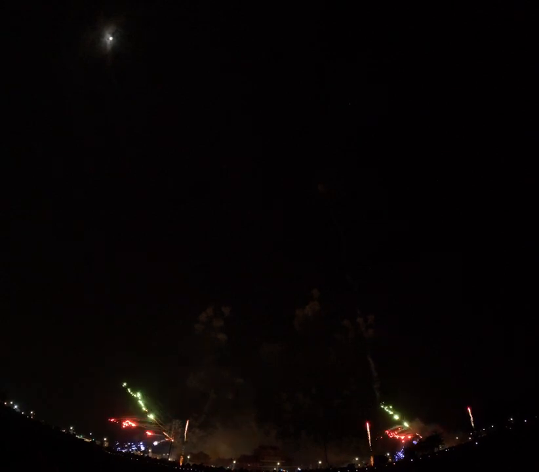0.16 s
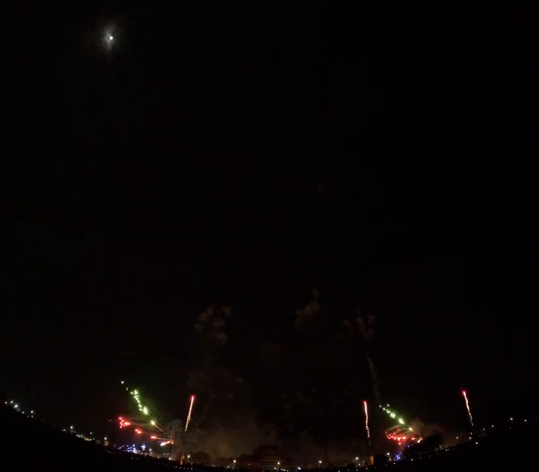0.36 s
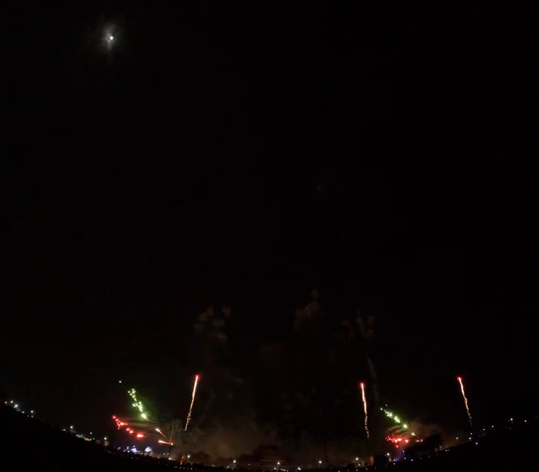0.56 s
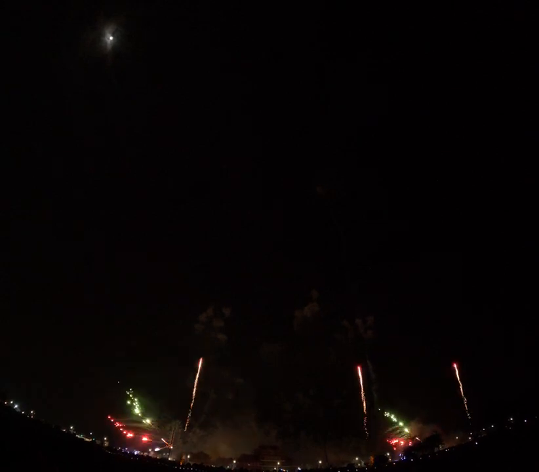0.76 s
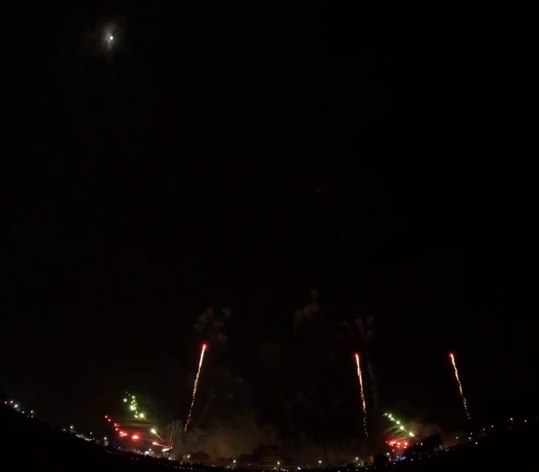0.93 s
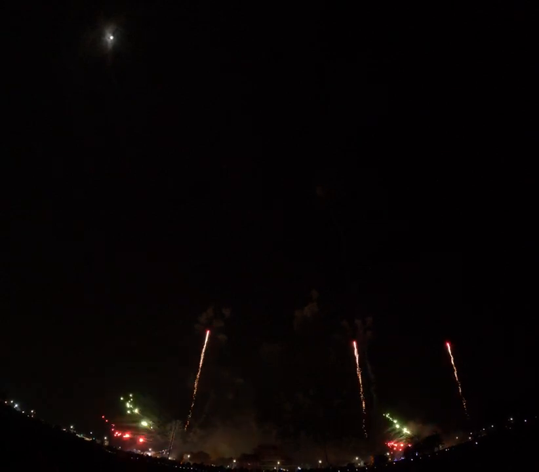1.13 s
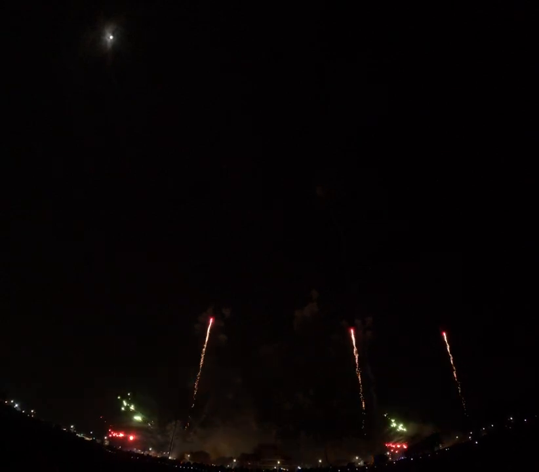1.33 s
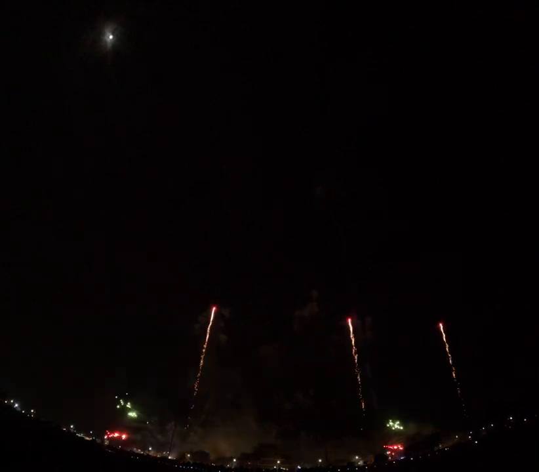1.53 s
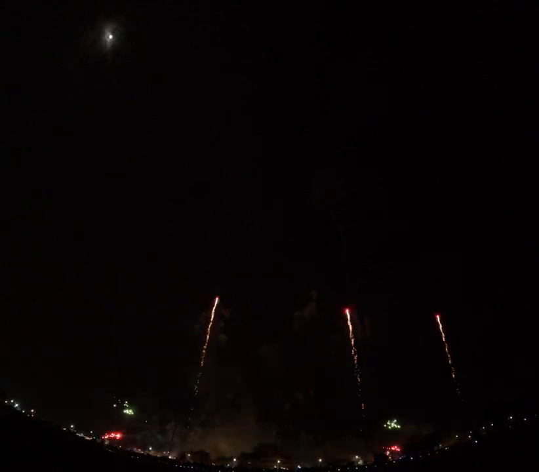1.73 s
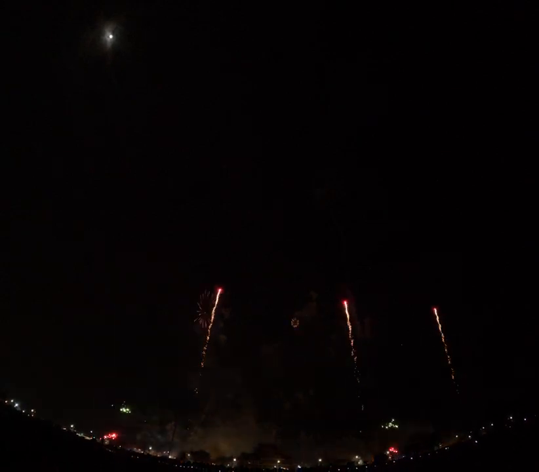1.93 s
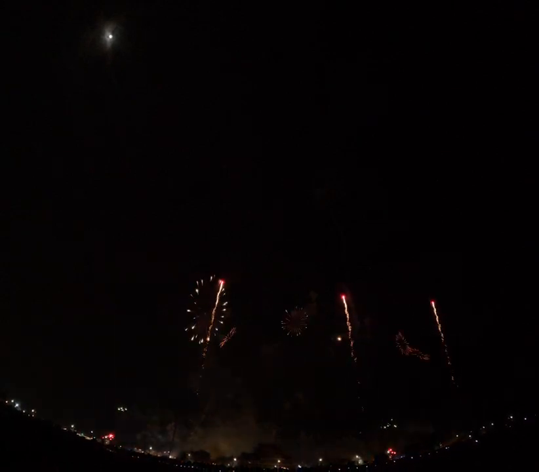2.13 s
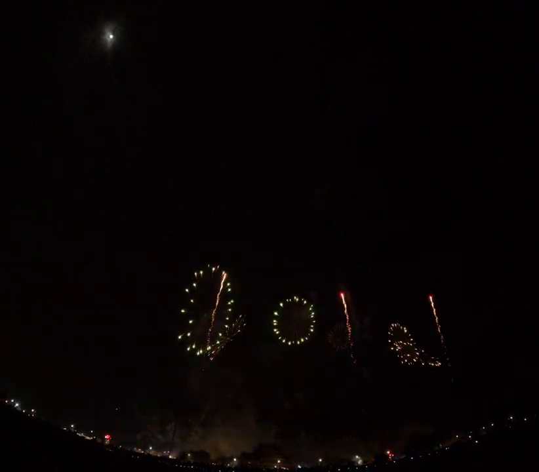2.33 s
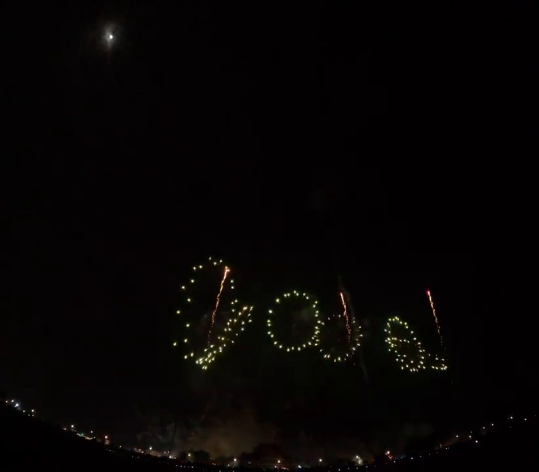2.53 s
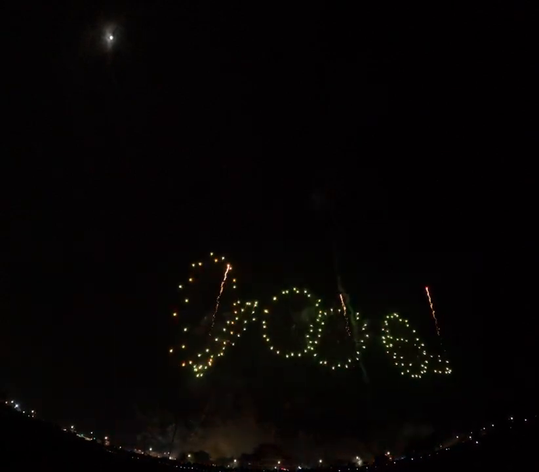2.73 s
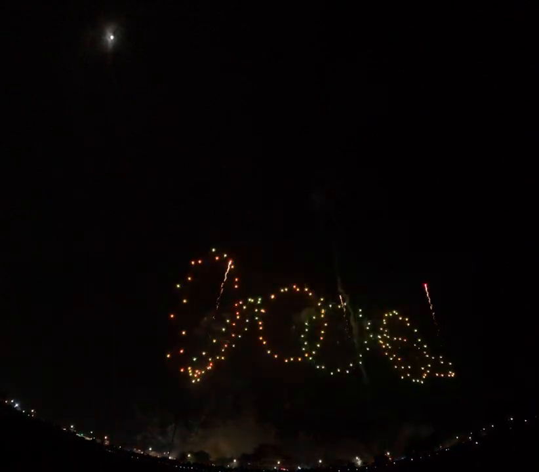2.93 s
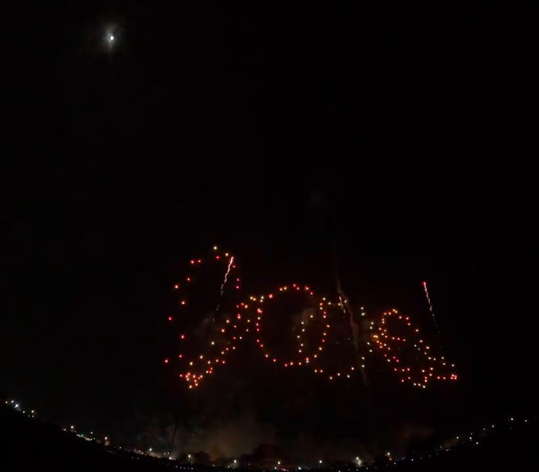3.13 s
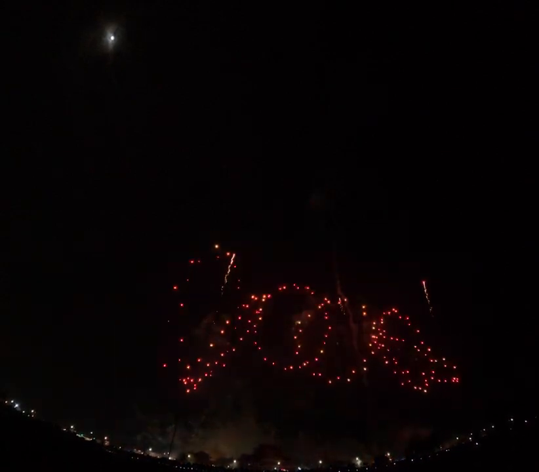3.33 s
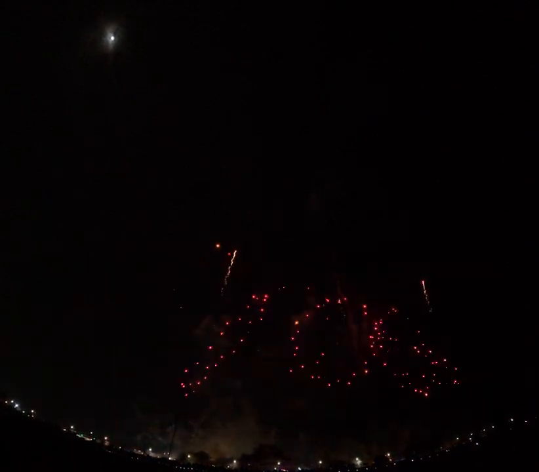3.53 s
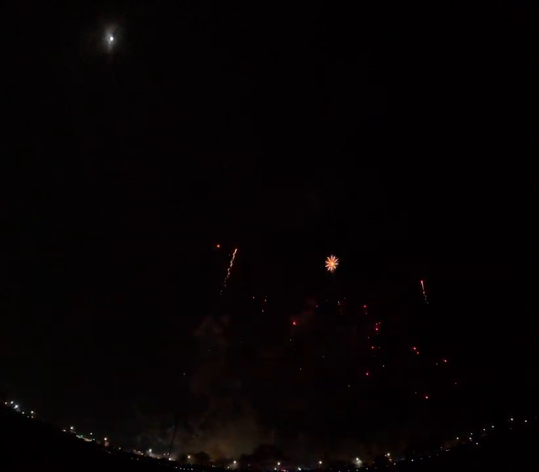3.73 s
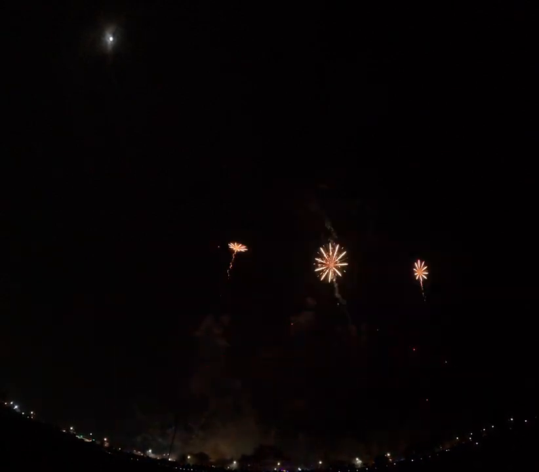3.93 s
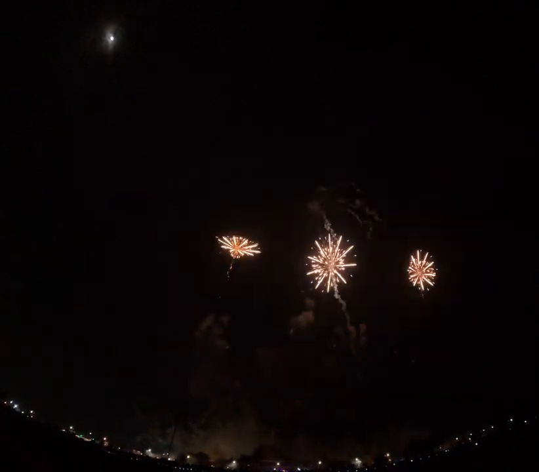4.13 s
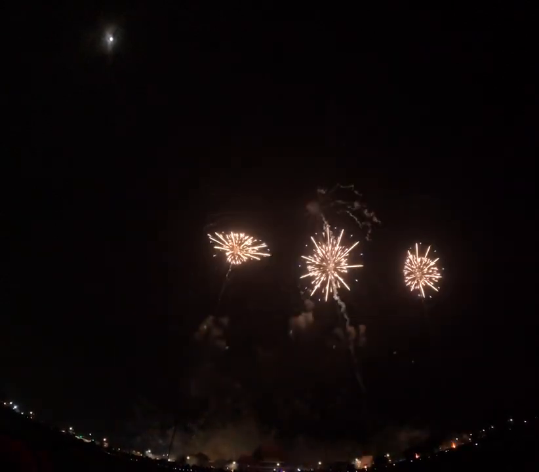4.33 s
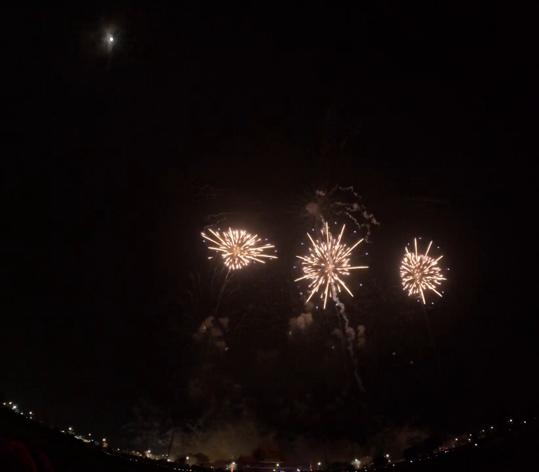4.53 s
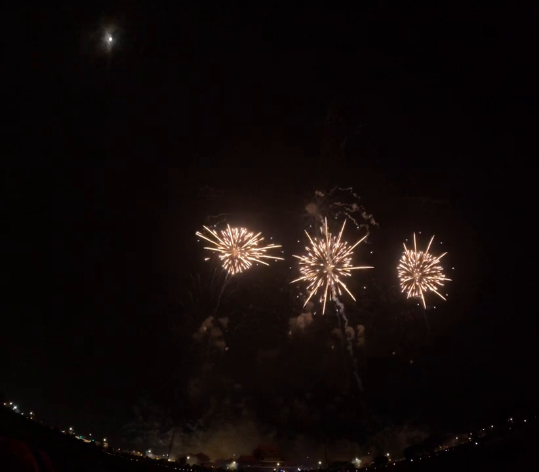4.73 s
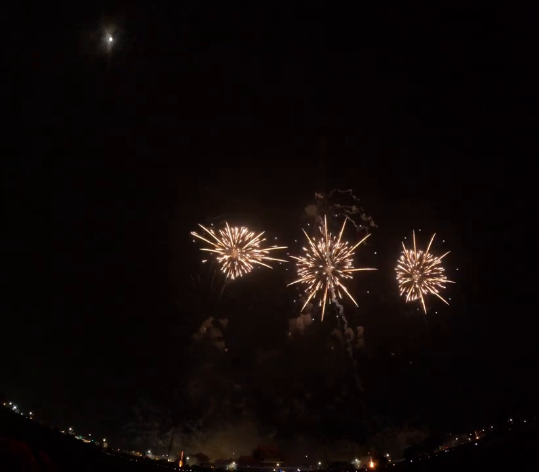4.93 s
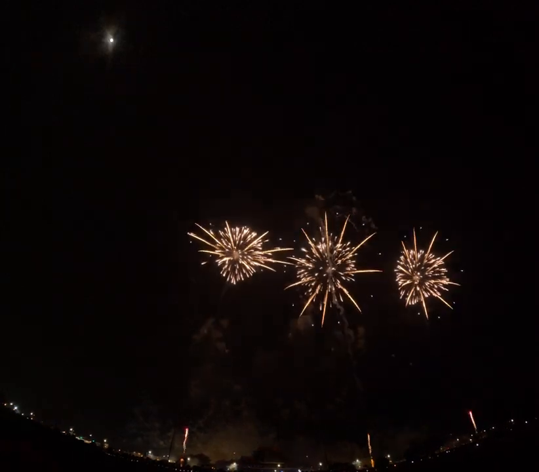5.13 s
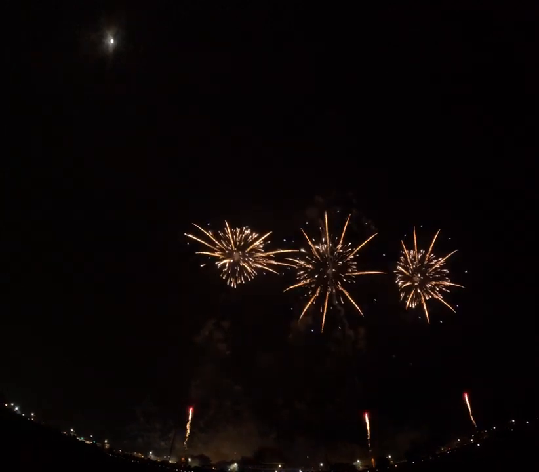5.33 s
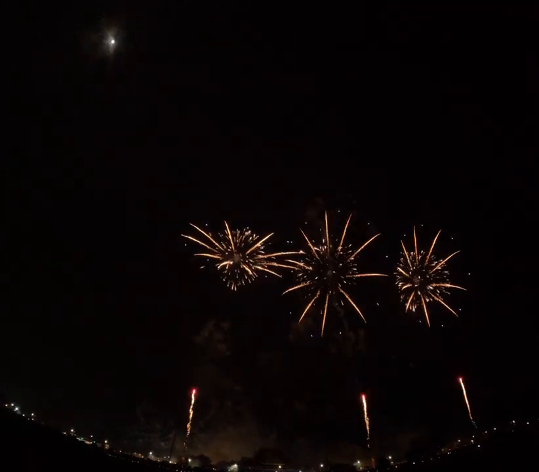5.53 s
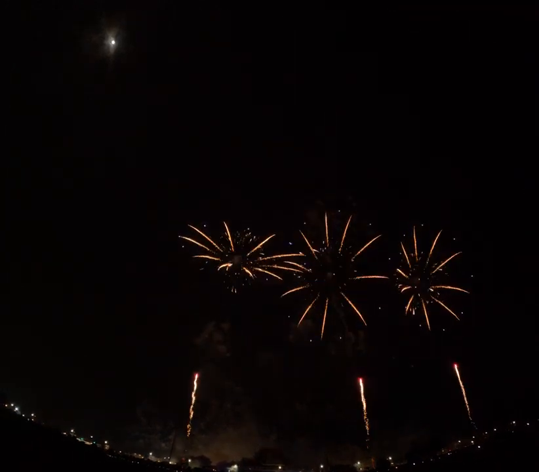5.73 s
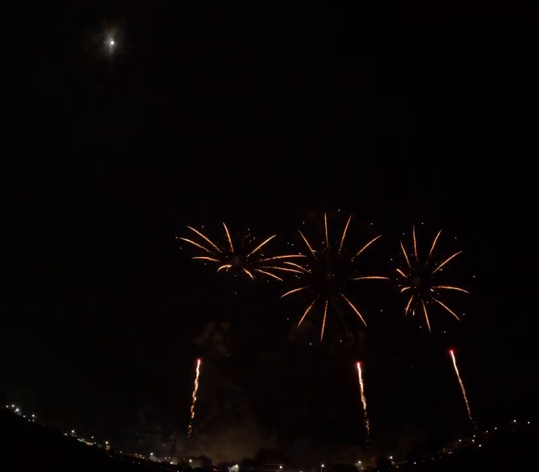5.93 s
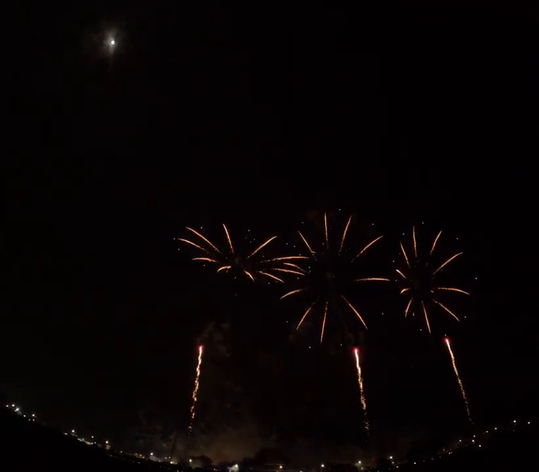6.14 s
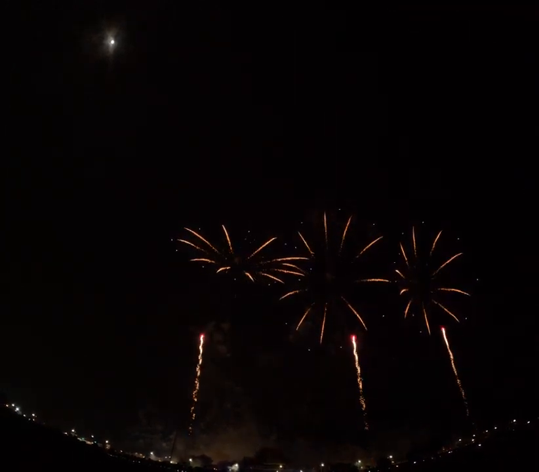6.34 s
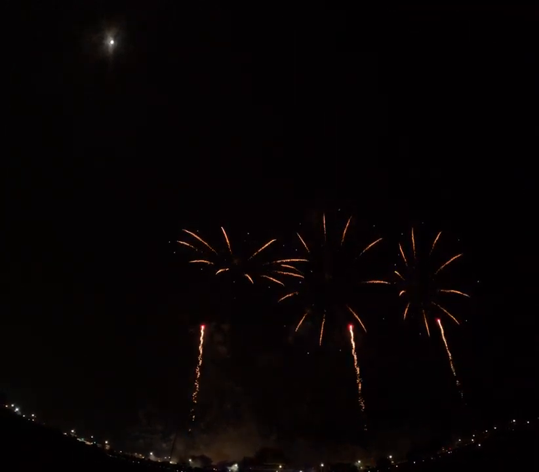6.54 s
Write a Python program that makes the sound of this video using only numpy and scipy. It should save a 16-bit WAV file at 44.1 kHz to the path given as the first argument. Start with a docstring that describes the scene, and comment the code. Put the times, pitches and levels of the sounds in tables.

```python
"""Open ground at night, a fireworks display heard from one spot.
Chains of small charges fire ten times a second, each a spike with scattered arrivals: the near ones dull
or sharp, the far ones blurred, over mortar thuds made of one deep swing. Two salvos of shells burst with
hard cracks and low booms, and filtered noise makes the far echoes that merge into a rolling rumble.
The bangs drive the recorder's limiter, so the rumble ducks after them and swells back."""
import sys
import numpy as np
from scipy import signal
from scipy.fft import rfft, irfft, next_fast_len
from scipy.io import wavfile
from scipy.ndimage import uniform_filter1d, minimum_filter1d, map_coordinates

SR = 44100
rng = np.random.default_rng(int(sys.argv[2]) if len(sys.argv) > 2 else 0)


def to_wav(sig):
    """Store sig (one row per channel, or 1-D mono) as 16-bit WAV at the path in sys.argv[1].

    Samples outside -1..1 are clipped; the rate is SR.
    """
    pcm = np.clip(np.atleast_2d(sig), -1, 1) * 32767
    pcm = np.round(pcm).astype(np.int16)
    wavfile.write(sys.argv[1], SR, pcm.T)  # frames by channels


N = 294147  # length in samples

# All levels in the tables are relative; each source has its own trim in scene().
# deep rumble before, between and after the salvos: [t/s, level/dB]
RUMBLE_LEVEL = [
    [(0.0, -33), (0.76, -26.5), (0.86, -31.5), (1.64, -30.5), (2.56, -40), (2.72, -34.5)],
    [(3.1, -35), (3.89, -34), (4.074, -35.5), (4.274, -41.5), (4.498, -36), (4.65, -41)],
    [(5.05, -27.5), (5.126, -26.5), (5.758, -22.5), (6.6, -33)],
]
# far echoes before, between and after the salvos: [t/s, roar level/dB, hiss level/dB, crackle level/dB]
ECHO_LEVEL = [
    [(0.0, -41.5, -39.5, -46), (1.16, -48, -45, -50.5), (1.48, -42.5, -44.5, -48.5), (2.17, -50, -41, -47),
     (2.55, -43.5, -43, -56)],
    [(3.35, -45.5, -45, -61), (3.616, -45.5, -45.5, -52.5), (3.922, -44.5, -43.5, -53),
     (4.352, -41, -45, -58), (4.65, -40, -44.5, -57)],
    [(5.1, -45, -44, -52), (5.328, -46, -44, -53), (5.734, -41.5, -43, -51.5), (6.33, -38.5, -42.5, -56.5),
     (6.65, -43.5, -47, -56.5)],
]
# spectra of the four echo layers: [f/Hz, density level/dB]
RUMBLE_SPECTRUM = [(12, -21.5), (22, -7.5), (45, 0), (75, -0.5), (100, -4.5), (130, -12), (200, -47.5),
                   (400, -77.5)]
ROAR_SPECTRUM = [(80, -25.5), (150, -4), (230, 0.5), (330, -2.5), (460, -2), (650, -8.5), (1100, -31.5),
                 (4000, -73)]
HISS_SPECTRUM = [(250, -24), (500, -1), (700, 1), (1050, -3), (1450, -7.5), (2200, -17), (3500, -26.5),
                 (7000, -43.5), (12000, -83)]
CRACKLE_SPECTRUM = [(700, -25.5), (1400, -4.5), (2000, -1.5), (3000, -4.5), (4200, -11.5), (6000, -19.5),
                    (7300, -26.5), (8500, -42), (15000, -51.5)]

# distant mortar thuds: [t of the deepest swing/s, peak level/dB, f/Hz]
MORTAR_THUDS = [(0.131, -6.5, 41), (0.202, -5, 55), (.361, -6.5, 54.7), (0.485, -11, 60.4),
                (.577, -5, 65.3), (0.625, -5, 45.5), (0.666, -3.5, 50.5), (0.739, -9, 64),
                (0.899, -6.5, 73.4), (1.419, -15, 82.4), (1.811, -17.5, 66), (2.482, -18.5, 68),
                (3.916, -11, 96), (3.955, -16, 95), (5.09, -12, 77), (5.293, -15, 70), (5.359, -9.5, 71.5),
                (5.602, -6, 64), (5.649, -6.5, 50.5), (5.938, -6.5, 50), (5.975, -9.5, 55.7)]

# far chains, blurred by distance: [first t/s, last t/s, first level/dB, last level/dB, body/dB, bite/dB]
FAR_CHAINS = [(0.811, 2.01, -18.5, -14, 4.5, 1), (1.98, 2.484, -19.5, -16.5, 5, 3.5),
              (2.139, 2.541, -25, -22, -7, 1.5)]
# single far pops: [t/s, level/dB, body/dB, bite/dB]
FAR_POPS = [(0.377, -23, -8, 16), (0.572, -18.5, 4, 2), (2.291, -20, 6, 8), (2.462, -19.5, 9, 0),
            (3.831, -21, 4, -11), (3.907, -12, -6.5, -8), (3.945, -17.5, -12, -13), (5.702, -29, -5, 1),
            (5.924, -19.5, 0, 8), (6.126, -18.5, 5, -10), (6.234, -17, 17, -9)]
# near dull reports: [t/s, level/dB]
DULL_REPORTS = [(0.0222, -5), (0.126, -3.5), (0.222, -6), (0.321, -8), (0.426, -10), (0.516, -6),
                (0.612, -4.5), (0.713, -12)]
# near sharp reports: [t/s, level/dB]
SHARP_REPORTS = [(0.039, -4), (0.14, -3), (0.236, -4), (0.334, -5), (0.432, -6.5), (0.538, -6.5),
                 (0.634, -8), (0.74, -11), (0.833, -10), (0.937, -8), (1.032, -11.5), (1.138, -9),
                 (1.234, -11.5), (1.331, -9), (1.442, -8), (1.529, -8.5), (1.63, -8.5), (1.73, -6.5)]
# tone along the sharp chain, full, then thin, then biting again: [t/s, body/dB, bite/dB]
SHARP_TONE = [(0.2, 11.5, 4), (0.42, 17, 12.5), (0.76, 2, -2), (1.1, 4, 2), (1.55, 1.5, 5.5)]
# spectra of a near report and of a far one: [f/Hz, level/dB]
NEAR_SPECTRUM = [(40, 8), (170, -10), (280, -1.5), (500, -3), (1200, 1.5), (1800, -6), (2800, -8),
                 (4000, -10), (7000, -21.5), (8300, -43.5), (11000, -38.5), (15000, -59)]
FAR_SPECTRUM = [(40, -10), (200, -1.5), (500, 3.5), (1000, 2), (1800, -5.5), (2700, -5), (4200, -5),
                (7000, -17.5), (8500, -31.5), (15000, -61.5)]

# tearing rasps that swell into the hardest bangs: [t of the bang/s, level/dB, rise/s, brightest f/Hz]
RASPS = [(2.6301, -9, 0.027, 2930), (2.9435, -11.5, 0.013, 4430), (4.7065, -9.5, 0.018, 1113),
         (4.829, -17.5, 0.013, 1840), (5.006, -27, 0.018, 1840)]
# spectrum of a rasp before its bright band: [f/Hz, level/dB]
RASP_SPECTRUM = [(100, 7.5), (300, -6), (700, -5), (1200, -1.5), (2000, -14), (3000, -10), (5000, -13),
                 (7000, -22.5), (8500, -43.5), (15000, -38)]
# shell bursts: [t/s, crack level/dB, boom level/dB, boom f/Hz, boom length/s, hollow ring level/dB]
SHELL_BURSTS = [(2.6325, 10.5, 6.5, 162, .013, -18), (2.8622, 6.5, 5.5, 174, 0.015, -2.5),
                (2.942, 8.5, 3.5, 180, 0.014, 0.5), (3.1063, -10, -4, 220, 0.012, -22),
                (3.179, -19, 0, 193, 0.0059, -21), (3.2702, 4, -4, 185, .012, -9.5),
                (4.7075, 6.5, 2, 118.5, 0.014, -6.5), (4.8297, 4.5, 2, 103, 0.015, -3.5),
                (5.0035, -2.5, -3, 141.5, 0.007, -12.5)]
# spectra of the crack, the grit in a bang and its long echo: [f/Hz, level/dB]
CRACK_SPECTRUM = [(60, -49), (250, 0), (550, 0), (1200, -0.5), (2500, -8), (5500, -20), (8500, -39.5),
                  (12000, -49), (15500, -52)]
GRIT_SPECTRUM = [(100, -4.5), (300, -0.5), (600, -4.5), (1300, -18.5), (3000, -25.5), (7000, -39),
                 (12000, -72)]
TAIL_SPECTRUM = [(100, 13.5), (400, 2), (1200, -8.5), (3000, -14), (6000, -22.5), (8000, -29),
                 (10000, -29.5), (12000, -41.5), (15000, -29.5)]

# decay of the scatter close by and of the land far off: [f/Hz, t60/s]
NEAR_DECAY = [(200, 0.17), (1500, 0.11), (10000, 0.26)]
FAR_DECAY = [(200, 0.37), (2000, 0.85), (6000, 1.4), (12000, 0.71)]
# microphone response: [f/Hz, gain/dB]
MICROPHONE = [(20, 1), (7500, -2), (9500, -4), (12000, -6), (15500, -15)]

WAVE_DB, WAVES_PER_S = 0.56, 7  # slow waves in the roar and hiss
BEAT_S, UNEVEN_DB = 0.1, 0.8  # far chains: time between charges, spread of their strength
SUCTION_DB = -8.5  # suction behind a shock front, relative to the boom
CEILING_DB, HOLD_S, RELEASE_DB_PER_S = 0, 0.13, 96  # limiter
TOP_HZ = 15750  # upper band limit of the recorder


def amp(db):
    """Decibels to gain."""
    return 10 ** (np.asarray(db) / 20)


def unit(x):
    """Scaled to rms 1."""
    return x / np.sqrt(np.mean(x ** 2) + 1e-20)


def along(points, hz):
    """(f, value) points read on a log frequency axis."""
    f, v = np.transpose(points)
    return np.interp(np.log(hz + 1), np.log(f + 1), v)


def wobble(rate):
    """A smooth random curve with the given number of knots a second."""
    knots = rng.standard_normal(int(N * rate / SR) + 4)
    return map_coordinates(knots, [np.arange(N) * rate / SR])


def curves(stretches):
    """One value per sample for each column after the time."""
    s, *columns = np.transpose(np.vstack(stretches))
    return [np.interp(np.arange(N) / SR, s, column) for column in columns]


def colour(x, spectrum, shelves=((100, 0), (10000, 0))):
    """Minimum-phase, causal filter with the gain of a spectrum plus optional shelves."""
    m = 2 * next_fast_len(len(x))
    hz = np.fft.rfftfreq(m, 1 / SR)
    gain_db = along(spectrum, hz) + along(shelves, hz)
    cepstrum = irfft(np.log(amp(gain_db)), m)
    # folding the cepstrum onto positive times makes the filter causal
    fold = 1 + np.sign(m / 2 - np.arange(m)) * (np.arange(m) > 0)
    response = np.exp(rfft(cepstrum * fold))
    return irfft(rfft(x, m) * response, m)[:len(x)]


def noise(spectrum, size):
    """Coloured noise of rms 1."""
    return unit(colour(rng.standard_normal(size), spectrum))


def add(track, s, sound):
    """Mix a sound into the track from time s."""
    start = max(round(s * SR), 0)
    part = sound[:max(N - start, 0)]
    track[start:start + len(part)] += part


def scatter(decay, size):
    """A diffuse echo of energy 1; each frequency dies at its own speed."""
    hz, t, z = signal.stft(rng.standard_normal(size), SR, nperseg=256)
    fade = amp(-60 * t / along(decay, hz)[:, None])
    tail = signal.istft(z * fade, SR, nperseg=256)[1]
    return tail / np.linalg.norm(tail)


def rolling_echoes(rumble_db, roar_db, hiss_db, crackle_db, flutter_db, lumps_db, grain_db):
    """Countless far echoes: a lumpy rumble, and a roar, hiss and fine crackle that flutter together."""
    rumble_level, = curves(RUMBLE_LEVEL)
    roar_level, hiss_level, crackle_level = curves(ECHO_LEVEL)
    flutter = flutter_db * wobble(60)
    waves = WAVE_DB * wobble(WAVES_PER_S)
    lumps = unit(amp(lumps_db * wobble(9.2)) * noise(RUMBLE_SPECTRUM, size=N))
    grains = unit(noise(CRACKLE_SPECTRUM, size=N) * amp(grain_db * wobble(580)))
    rumble = amp(rumble_level + rumble_db) * lumps
    roar = amp(roar_level + roar_db + waves + flutter) * noise(ROAR_SPECTRUM, size=N)
    hiss = amp(hiss_level + hiss_db + waves + flutter) * noise(HISS_SPECTRUM, size=N)
    crackle = amp(crackle_level + crackle_db + flutter) * grains
    return rumble + roar + hiss + crackle


def mortar_thuds(level_db, cycles):
    """Distant mortars: one deep swing of pressure between two smaller ones."""
    track, t = np.zeros(N), np.arange(-(SR // 16), SR // 16) / SR
    for s, db, hz in MORTAR_THUDS:
        envelope = np.exp(-(hz * t / cycles) ** 2)
        swing = -np.cos(2 * np.pi * hz * t) * envelope
        add(track, s + t[0], amp(db + level_db) * swing)
    return track


def far_charges():
    """Each far chain fires on a steady beat and grows louder, its charges slightly uneven in strength."""
    rows = []
    for first, last, first_db, last_db, body, bite in FAR_CHAINS:
        count = round((last - first) / BEAT_S) + 1
        times = np.linspace(first, last, count)
        strengths = np.linspace(first_db, last_db, count) + UNEVEN_DB * rng.standard_normal(count)
        rows += [(s, db, body, bite) for s, db in zip(times, strengths)]
    return rows


def dull_charges(body_db, bite_db):
    """The near dull charges all share one tone."""
    return [(s, db, body_db, bite_db) for s, db in DULL_REPORTS]


def sharp_charges():
    """The tone of the near sharp charges drifts along their chain."""
    when, body, bite = np.transpose(SHARP_TONE)
    return [(s, db, np.interp(s, when, body), np.interp(s, when, bite)) for s, db in SHARP_REPORTS]


def reports(rows, spectrum, level_db, smear_s, smear_db, ground, echo_db, treble_db):
    """Each small charge: a spike, its inverted bounce off the ground and a clump of scattered arrivals."""
    track, t = np.zeros(N), np.arange(SR // 6) / SR
    for s, db, body, bite in rows:
        # a few strong paths among many weak ones give every shot its own colour
        clump = rng.standard_normal(len(t)) ** 3 * t * np.exp(-t / smear_s)
        paths = amp(smear_db) * clump / np.linalg.norm(clump)
        direct = round(0.0025 * SR)
        bounce = direct + round(rng.uniform(0.0002, 0.0005) * SR)
        paths[direct] += 1
        paths[bounce] -= ground
        tone = [(350, body), (1000, 0.0018), (2300, bite), (5000, bite + treble_db)]
        pop = colour(paths, spectrum, tone)
        pop *= amp(db + level_db) / np.linalg.norm(pop)
        echo = signal.fftconvolve(pop, scatter(NEAR_DECAY, size=SR // 5))
        add(track, s, pop)
        add(track, s, amp(echo_db) * echo)
    return track


def rasps(level_db, focus_db):
    """A brief tearing noise, brightest in one band, that swells and stops short at the crack."""
    track, ahead = np.zeros(N), np.arange(SR // 16)[::-1] / SR  # time left before the bang
    for s, db, rise, hz in RASPS:
        swell = np.exp(-(ahead / rise) ** 3) + 0.12 * np.exp(-ahead / rise)
        bright_band = [(hz / 1.7, 0), (hz, focus_db), (hz * 1.13, 0)]
        tear = colour(noise(RASP_SPECTRUM, size=len(ahead)), bright_band)
        add(track, s - ahead[0], amp(db + level_db) * swell * unit(tear))
    return track


def shells(crack_db, punch_db, punch_hz, grit_db, grit_t60, ring_hz, ring_t60, tail_db):
    """A shock front, a few swings of low boom, and a long echo from the land around."""
    track, t = np.zeros(N), np.arange(SR // 8) / SR
    crack = colour(signal.unit_impulse(len(t)), CRACK_SPECTRUM)
    crack /= abs(crack).max()
    for s, front_db, boom_db, hz, length, ring_db in SHELL_BURSTS:
        add(track, s, amp(front_db + crack_db) * crack)
        # the suction behind the front leads the boom, which stops quickly
        suction = np.exp(-((t - 0.0007) / 0.0004) ** 2)
        add(track, s, -amp(boom_db + SUCTION_DB) * suction)
        # a higher swing, different in every shell, gives the boom its punch
        shell_punch_hz = punch_hz * np.exp(0.12 * rng.standard_normal())
        punch = amp(punch_db) * np.sin(2 * np.pi * shell_punch_hz * t)
        boom = (np.sin(2 * np.pi * hz * t) + punch) * np.exp(-(t / length) ** 4)
        add(track, s + 0.00097, amp(boom_db) * boom)
        grit = noise(GRIT_SPECTRUM, size=len(t))
        add(track, s, amp(boom_db + grit_db - 60 * t / grit_t60) * grit)
        # a short hollow ring follows the blow
        shell_ring_hz = ring_hz * np.exp(0.06 * rng.standard_normal())
        ring = np.sin(2 * np.pi * shell_ring_hz * t)
        add(track, s + length, amp(ring_db - 60 * t / ring_t60) * ring)
        land_echo = colour(scatter(FAR_DECAY, size=2 * SR), TAIL_SPECTRUM)
        add(track, s, amp(boom_db + tail_db) * land_echo)
    return track


def scene():
    """All the fireworks, from the far rumble to the shells, heard from one spot."""
    echoes = rolling_echoes(rumble_db=2.5, roar_db=2.0, hiss_db=0.5, crackle_db=-0.5,
                            flutter_db=0.4, lumps_db=2.23, grain_db=3)
    mortars = mortar_thuds(level_db=-3.5, cycles=0.7)
    far = reports(far_charges() + FAR_POPS, FAR_SPECTRUM, level_db=12.0, smear_s=0.0031, smear_db=15,
                  ground=0.3, echo_db=0.0, treble_db=-16.5)
    dull = reports(dull_charges(body_db=10, bite_db=-5), NEAR_SPECTRUM, level_db=12, smear_s=0.0021,
                   smear_db=7, ground=0.26, echo_db=0, treble_db=-2.5)
    sharp = reports(sharp_charges(), NEAR_SPECTRUM, level_db=15.5, smear_s=0.0018, smear_db=0,
                    ground=0.27, echo_db=-16.0, treble_db=-9.5)
    tearing = rasps(level_db=-3.0, focus_db=10)
    bangs = shells(crack_db=-1.0, punch_db=-12.5, punch_hz=407, grit_db=-8.5, grit_t60=0.09,
                   ring_hz=243, ring_t60=0.07, tail_db=15.5)
    return (echoes + mortars + far + dull + sharp + tearing + bangs)[None]


def limiter(x):
    """The gain drops just ahead of a peak, holds, then recovers steadily in decibels."""
    ahead, span = SR // 1000, round(HOLD_S * SR)
    excess = 20 * np.log10(np.maximum(abs(x) / amp(CEILING_DB), 1))
    # a running maximum holds each cut
    held = -minimum_filter1d(-excess, span, origin=(span - 1) // 2 - ahead)
    release = RELEASE_DB_PER_S * np.arange(N) / SR
    cut_db = np.maximum.accumulate(held + release) - release
    return x * amp(-uniform_filter1d(cut_db, ahead))


def record(dry):
    """Limiting, rounding of the highest peaks, the microphone's duller top, then the band limit."""
    limited = limiter(dry[0])
    rounded = limited / (1 + limited ** 6) ** (1 / 6)
    heard = colour(rounded, MICROPHONE)
    m = next_fast_len(N + SR // 2)
    in_band = np.fft.rfftfreq(m, 1 / SR) < TOP_HZ
    return irfft(rfft(heard, m) * in_band, m)[None, :N]


dry = scene()
out = record(dry)
to_wav(out)
```